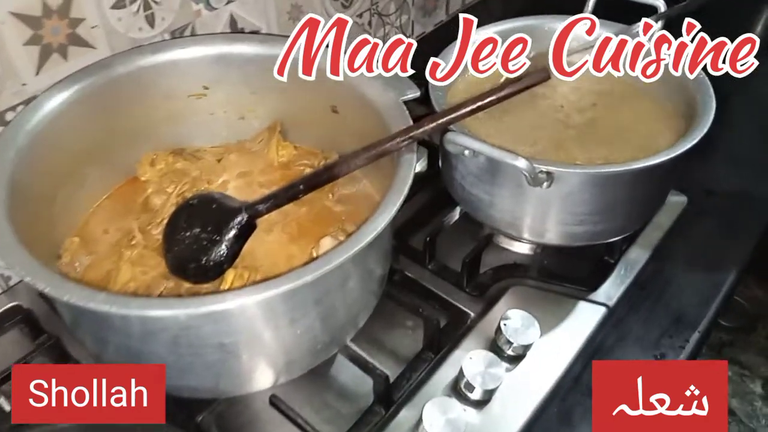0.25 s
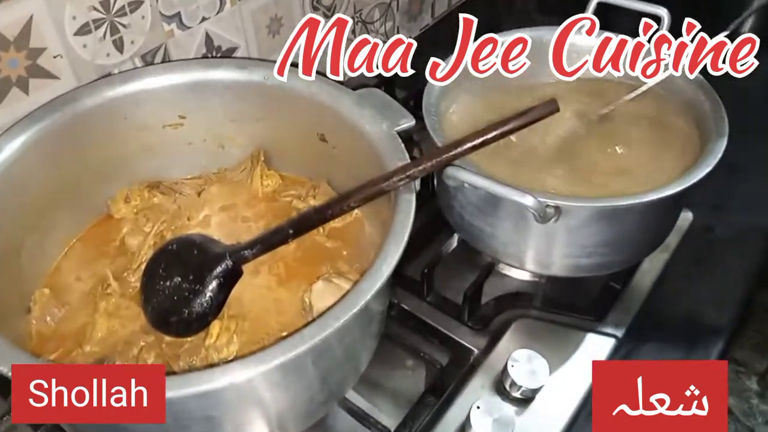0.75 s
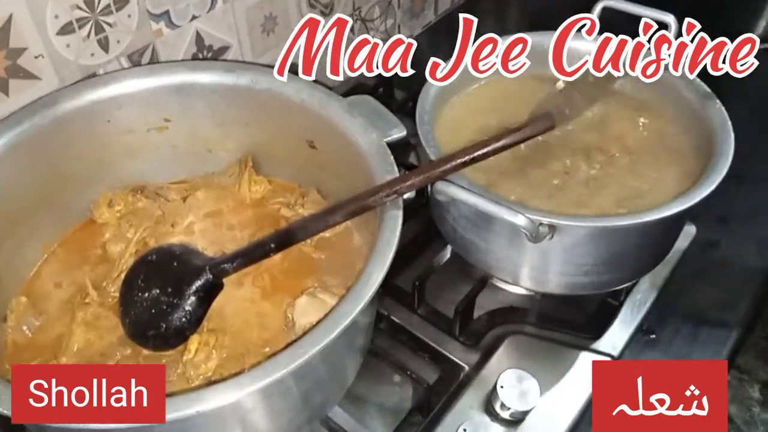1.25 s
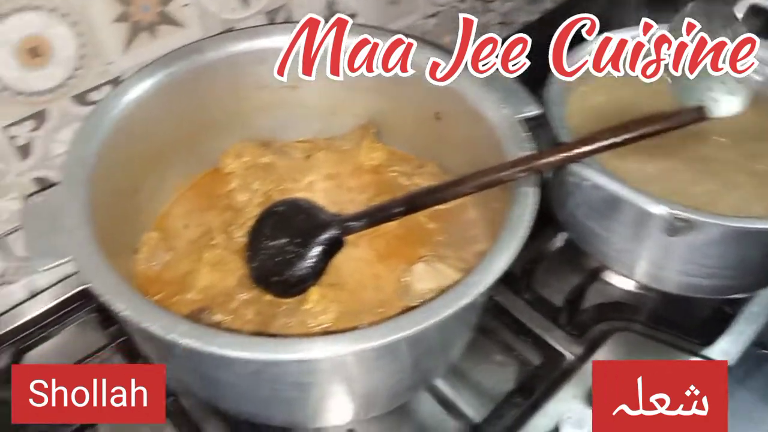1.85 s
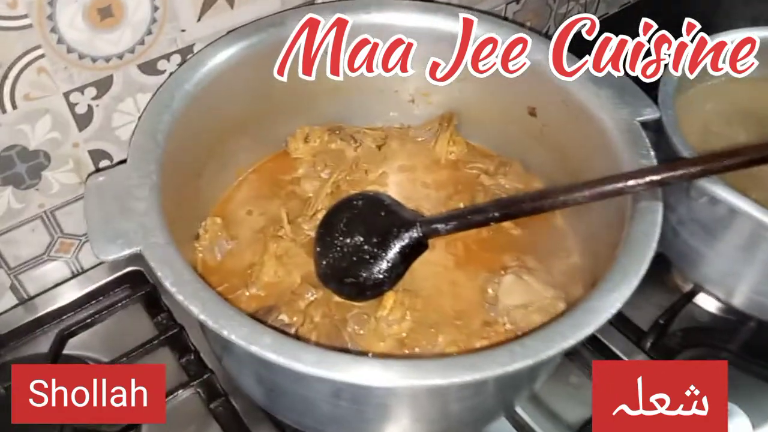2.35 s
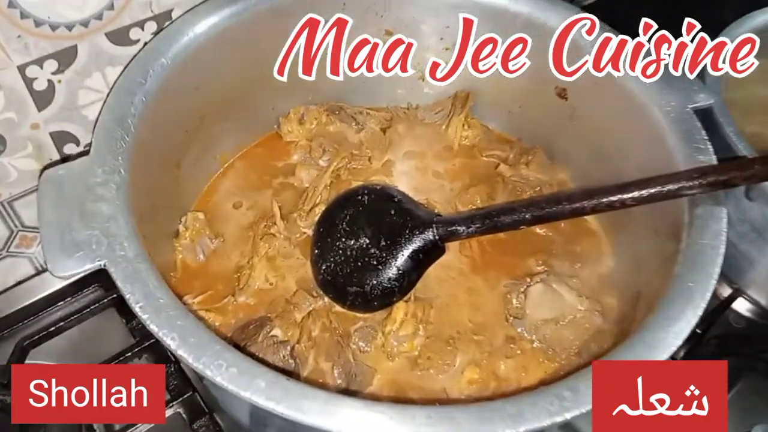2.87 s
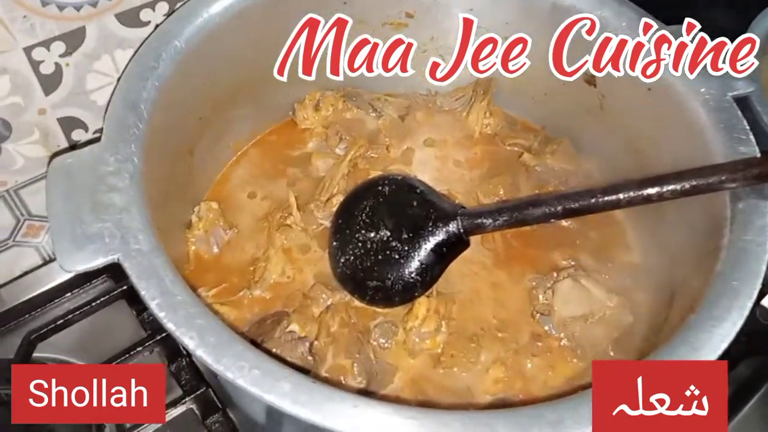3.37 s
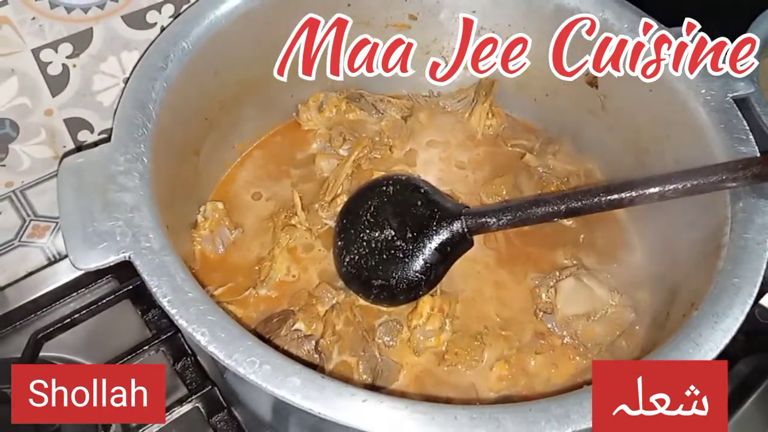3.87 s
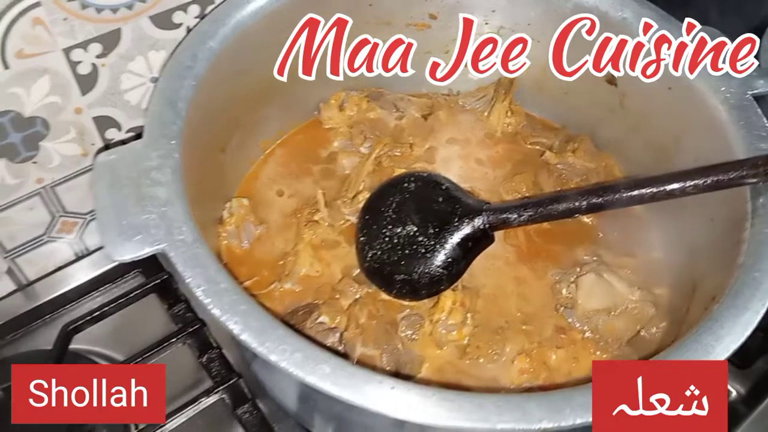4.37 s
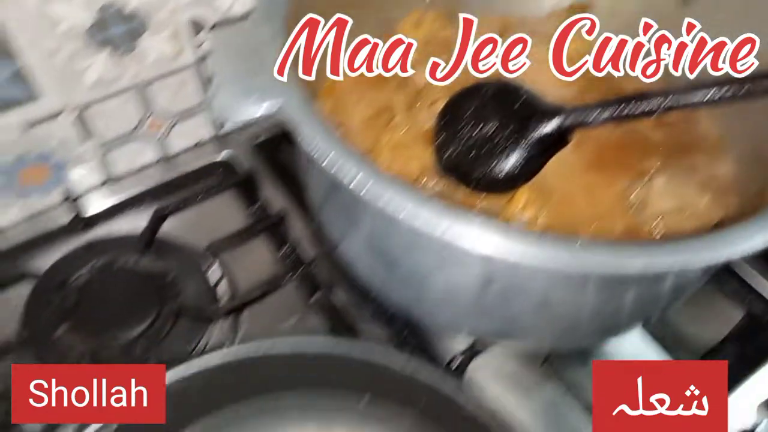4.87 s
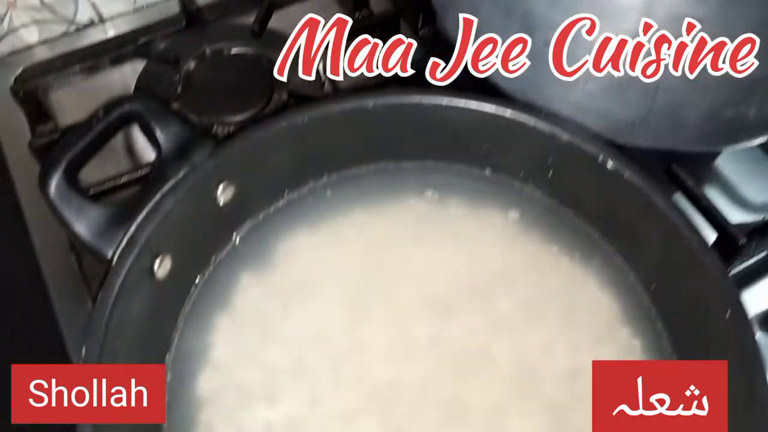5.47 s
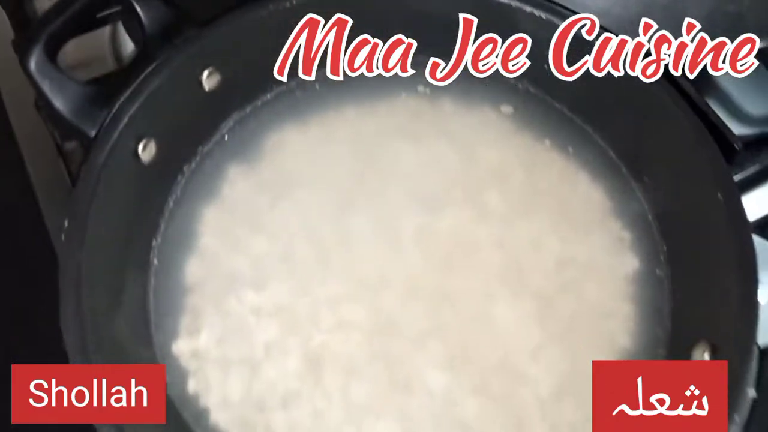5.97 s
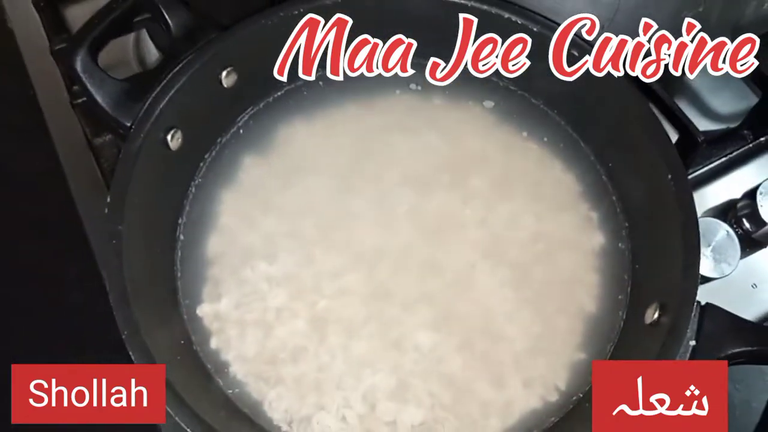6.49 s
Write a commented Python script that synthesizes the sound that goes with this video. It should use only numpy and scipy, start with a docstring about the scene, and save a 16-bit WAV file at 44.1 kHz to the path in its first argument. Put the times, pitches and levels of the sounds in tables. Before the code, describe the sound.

A ladle knocks ten times, hard and ringing, on a big aluminium pot in a kitchen, then a metal lid clatters and dull bumps follow.

```python
"""A ladle knocks on the wall of a large aluminium pot: cracks, beating shell modes, a noisy wash and a stove-top boom.
A lid clatters on its rim as uneven contact noise rings sheet-metal resonances; things are set down with
dull bumps of grainy noise. Pops are short damped tones, and a stew simmers in a small kitchen, amid filtered
background noise left blotchy by the noise suppressor of the phone that listens, which shortens the tails.
"""
import sys
import numpy as np
from scipy import signal
from scipy.fft import rfft, irfft, next_fast_len
from scipy.io import wavfile
from scipy.ndimage import uniform_filter1d, minimum_filter1d

SR = 44100
rng = np.random.default_rng(int(sys.argv[2]) if len(sys.argv) > 2 else 0)


def persist_wave(psi):
    """Save psi, clipped to +-1, as 16-bit WAV."""
    counts = np.round(np.clip(psi, -1, 1) * 32767).astype(np.int16)
    wavfile.write(sys.argv[1], SR, np.atleast_2d(counts).T)


N = 296828  # length in samples
T = np.arange(int(.6 * SR)) / SR  # time axis of one short sound, s
DEPTH_DB = 12  # deepest cut of the suppressor; the background is raised by as much
SPREAD_DB = 2.2  # random spread of mode strengths in the pot and the stove top


def amp(db):
    """Decibels to gain."""
    return 10 ** (np.asarray(db) / 20)


def unit(x):
    """Scaled to rms 1."""
    return x / np.sqrt(np.mean(x ** 2) + 1e-20)


def smooth(x, first, second, **axis):
    """Two running means in a row, for a rounder window than one."""
    return uniform_filter1d(uniform_filter1d(x, size=first, **axis), size=second, **axis)


def along(points, hz):
    """Reads a curve of (f/Hz, value) points on a log frequency axis."""
    f, value = np.transpose(points)
    return np.interp(np.log(hz + 1), np.log(f + 1), value)


def filtered(x, response):
    """x times a complex response of frequency, padded so that tails do not wrap round."""
    m = next_fast_len(N + SR // 2)
    return irfft(rfft(x, m) * response(np.fft.rfftfreq(m, 1 / SR)), m)[..., :N]


def coloured(x, spectrum):
    """x shaped by a (f/Hz, level/dB) curve and scaled to rms 1."""
    return unit(filtered(x, lambda hz: amp(along(spectrum, hz))))


def resonances(peaks):
    """A causal response made of (f/Hz, width/Hz, level/dB) peaks of alternating sign."""
    def response(f):
        total = 0
        for k, (centre, width, db) in enumerate(peaks):
            damping = 1j * f * width
            total = total + (-1) ** k * amp(db) * damping / (centre * centre - f * f + damping)
        return total
    return response


def onset(rise):
    """An exponential approach to full level; rise is its time constant in s."""
    return 1 - np.exp(-T / rise)


def add(track, s, sound):
    """Lays a sound on the track from second s."""
    part = track[round(s * SR):][:len(sound)]
    part += sound[:len(part)]


def ring(modes, slow, spread_db):
    """Modes struck at new strengths; each is a close pair that beats, as in a shell that is not quite round."""
    out = 0
    for hz, db, t60 in modes:
        neighbour_hz = hz + np.sqrt(hz) * rng.normal(.6, .2)
        pair = np.sin(2 * np.pi * hz * T) + 0.62 * np.sin(2 * np.pi * neighbour_hz * T)
        decay_db = -60 * T / (t60 * slow)
        out = out + amp(db + rng.normal(0, spread_db) + decay_db) * pair
    return out


def tilt(hz, bright_db):
    """A harder contact trades bass for treble: dB at each frequency."""
    return bright_db * np.tanh(np.log2((hz + 50) / 1200))


# Damping of noise bursts by pot and room: f/Hz, t60/s at decay factor 1
BURST_DECAY = [(80, 0.85), (210, 0.41), (560, 0.41), (1470, 0.45), (3880, 0.4), (8000, 0.23), (12000, 0.38),
               (15500, .22)]
STREAK_DB = 4.5  # rms unevenness of the crowded peaks


def burst(spectrum, bright_db, slow):
    """Noise of crowded narrow peaks that starts near rms 1, each frequency dying at its own speed."""
    white = rfft(rng.standard_normal(len(T)))
    peaks = unit(smooth(rng.standard_normal(len(white)), 30, 30))
    streaked = unit(irfft(white * amp(STREAK_DB * peaks), len(T)))
    hz, t, z = signal.stft(streaked, SR, nperseg=256)
    colour = amp(along(spectrum, hz) + tilt(hz, bright_db))[:, None]
    t60 = slow * along(BURST_DECAY, hz)[:, None]
    tail = signal.istft(z * colour * amp(-60 * t / t60), SR, nperseg=256)[1][:len(T)]
    return tail / np.sqrt(np.mean(colour ** 2))


# Spectral shapes of the background layers, each later scaled to rms 1: f/Hz, relative level/dB
HISS_SPECTRUM = [(530, -36), (1100, -7.5), (1350, -2.5), (1900, 2.5), (2550, -5), (2700, -15),
                 (3800, -51.5)]
SIZZLE_SPECTRUM = [(1400, -27), (2400, -18), (2900, -1), (3770, 4), (4470, 6), (5500, -5), (8000, -23),
                   (13500, -23), (15200, -14), (16100, -15), (16500, -43)]
ROAR_SPECTRUM = [(18, -45.5), (30, -5), (103, 2.5), (305, -5), (398, -6), (810, -1.5), (1110, -14.5),
                 (1300, -3.5), (1690, -28.5), (2860, -120)]
# Brief swells of the hiss: t/s, level/dB before the DEPTH_DB lift, half width/s (to 1/e)
HISS_SWELLS = [(0.839, -70, 0.058), (2.5, -56.5, 0.053), (2.722, -56.5, 0.093)]
# Layer levels in dB before the DEPTH_DB lift: steady part, and extra at the start that fades
HISS_DB, HISS_START_DB = -72, -61
SIZZLE_DB, SIZZLE_START_DB = -72.5, -77.5
ROAR_DB = -70.0
SETTLE_MIDDLE_S, SETTLE_SCALE_S = 0.5, 0.29  # midpoint and time scale of the S-shaped fade
SPITS_PER_S = 25


def simmer():
    """Burner roar, a background hiss that drops as the noise suppressor settles, and a sizzle with sparse spits."""
    t = np.arange(N) / SR
    settling = 1 / (1 + np.exp((t - SETTLE_MIDDLE_S) / SETTLE_SCALE_S))
    swells = sum(amp(db) * np.exp(-((t - s) / width) ** 2) for s, db, width in HISS_SWELLS)

    # the three layers share one field of suppressor blotches
    z = signal.stft(rng.standard_normal((3, N)), nperseg=512)[2]
    blotches = uniform_filter1d(rng.standard_normal(z.shape[1:]), size=5, axis=0)
    blotches = uniform_filter1d(blotches, size=8, axis=1)
    noise = signal.istft(z * amp(0.71 * unit(blotches)), nperseg=512)[1][:, :N]
    spits = (rng.random(N) < SPITS_PER_S / SR) * rng.standard_normal(N) * 9
    noise[1] += spits

    hiss = coloured(noise[0], HISS_SPECTRUM)
    sizzle = coloured(noise[1], SIZZLE_SPECTRUM)
    roar = coloured(noise[2], ROAR_SPECTRUM)
    mix = (amp(HISS_DB) + amp(HISS_START_DB) * settling + swells) * hiss
    mix += (amp(SIZZLE_DB) + amp(SIZZLE_START_DB) * settling) * sizzle
    mix += amp(ROAR_DB) * roar
    return amp(DEPTH_DB) * mix


# Clear pops and ticks: t/s, relative level/dB, f/Hz
CLEAR_TICKS = [(0.1401, -45, 3730), (0.196, -50.5, 660), (0.3342, -46, 3900), (0.4705, -46.5, 3900),
               (0.703, -46.5, 4060), (0.9967, -45, 3650), (1.94, -35, 3770), (2.384, -48, 1680),
               (2.5614, -34.5, 3920), (3, -45, 4180), (3.2894, -48.5, 3470), (3.5473, -39, 3600),
               (3.725, -49.5, 843), (4.007, -47.5, 1910), (4.101, -48, 1730), (4.243, -51, 888),
               (4.479, -50.5, 1412), (5.189, -46.5, 1650), (5.25, -48, 1725), (5.799, -52.5, 862),
               (5.928, -50, 1300), (6.03, -51.5, 1250), (6.106, -51.5, 1306), (6.184, -47.5, 1215),
               (6.499, -50.5, 1860)]
TICK_CYCLES = 38  # cycles of the main resonance until it is 60 dB down
FAINT_COUNT, FAINT_FLOOR_DB, FAINT_RANGE_DB = 40, -60, 8  # scattered pops, levels relative
FAINT_LOW_HZ, FAINT_HIGH_HZ = 696, 4600


def ticks():
    """Short pops, some clear and many faint: one damped resonance with weak neighbours."""
    out = np.zeros(N)
    faint = []
    for place, strength, pitch in rng.random((FAINT_COUNT, 3)):
        hz = FAINT_LOW_HZ * (FAINT_HIGH_HZ / FAINT_LOW_HZ) ** pitch
        faint.append((place * N / SR, FAINT_FLOOR_DB + FAINT_RANGE_DB * strength, hz))
    for s, db, hz in CLEAR_TICKS + faint:
        modes = [(hz, 7.5, 1), (1.08 * hz, 2.5, .6), (.88 * hz, 2.5, .6)]
        pop = ring(modes, TICK_CYCLES / hz, 0.5)
        add(out, max(s - .001, 0), amp(db) * pop * onset(3 / hz))
    return out


# Lid on rim: t/s, strike level/dB, rattle level/dB, rise/s, hold/s, fall/(dB/s),
# then low, middle and upper ring level/dB relative to the rattle
LID_STRIKES = [(4.556, -4, -19.5, 0.002, 0.016, 151, -19, -0.5, -12.5),
               (4.625, -6, -25, .004, 0.019, 191, -6.5, -4, -11.5),
               (4.716, -2.5, -20, 0.0083, .03, 203, -1.5, -9.5, -9),
               (4.777, -4, -25.5, 0.0064, .02, 225, -1, -4, -7),
               (4.896, -9, -19.5, 0.0039, 0.061, 227, -9, -9.5, -8.5),
               (5.019, -40, -40, 0.013, 0.015, 136.5, 8.5, 0, -0.5)]
# Low, middle and upper groups of rings: f/Hz, width/Hz, relative level/dB
LID_RINGS = [
    [(287, 28, 4.5), (353.5, 12.2, 6.5), (486, 120, -8)],
    [(983, 7.2, -6), (1046.5, 28, -3)],
    [(1355, 24, -3.5), (1287, 10, -8)],
]
# Sheet-metal modes of the lid: f/Hz, width/Hz, relative level/dB
LID_MODES = [(1646, 31, 1), (1817, 13, -1.5), (1985, 14, -1.5), (2237, 36, -7), (2517, 14, -3.5),
             (2610, 12, -3), (2900, 20, -5), (3275, 25, 1.5), (3245, 14, -12), (3546, 84, 2),
             (3780, 15, -3), (4040, 20, 2.5), (4340, 30, 1.5), (4880, 7.8, 2.5), (4970, 5.2, -1.5),
             (5480, 26, -6.5), (6250, 25, -7), (6830, 29, -15)]
# Spectral shape of metal contact: f/Hz, relative level/dB
CLASH_SPECTRUM = [(90, -49.5), (150, -22), (280, -4), (1000, -11.5), (1600, -8.5), (3560, -12),
                  (5800, -14.5), (7800, -33.5), (10000, -46), (13500, -49.5), (15300, -30.5),
                  (15900, -45.5), (16300, -74)]
LID_SPREAD_DB = 3.5  # random spread of the mode strengths at each strike
STRIKE_T60_S = 0.11  # fade laid over the burst's own decay


def rolled_off(peaks):
    """Resonances with their treble skirts rolled off, as by the microphone."""
    return lambda hz: resonances(peaks)(hz) / (1 + 1j * hz / 6000) ** 4


def lid():
    """Strikes and dense uneven contacts drive thin sheet metal, which rings on as the contact hiss dies."""
    s, strike_db, rattle_db, rise, hold, fall, *rings_db = np.transpose(LID_STRIKES)[..., None]
    t = np.maximum(np.arange(N) / SR - s, 0)
    rattles = (1 - np.exp(-t / rise)) * amp(rattle_db - fall * np.maximum(t - hold, 0))

    def force(db):
        """All rattles together, summed as powers."""
        return np.linalg.norm(rattles * amp(db), axis=0)

    unevenness_db = uniform_filter1d(rng.standard_normal((5, N)), size=90) * 32
    contacts = unit(rng.standard_normal((5, N)) * amp(unevenness_db))
    out = force(0) ** 1.03 * amp(-3.0) * coloured(contacts[0], CLASH_SPECTRUM)

    for drive, peaks, db in zip(contacts[2:], LID_RINGS, rings_db):
        steady_ring = filtered(drive, rolled_off(peaks))
        out += filtered(force(db) * drive, rolled_off(peaks)) / np.std(steady_ring)

    sheet_gain = amp(-4) / np.std(filtered(contacts[1], rolled_off(LID_MODES)))
    for start, db, rattle in zip(s[:, 0], strike_db[:, 0], rattles):
        struck = [(hz, width, level + rng.normal(0, LID_SPREAD_DB)) for hz, width, level in LID_MODES]
        out += sheet_gain * filtered(rattle * contacts[1], rolled_off(struck))
        strike = amp(db - 12 - 60 * T / STRIKE_T60_S) * burst(CLASH_SPECTRUM, 0, 1)
        add(out, start - .0015, strike * onset(0.0018))
    return out


# Dull bumps and scrapes: t/s, level/dB, rise/s, decay factor, brightness/dB,
# boom level/dB, knock f/Hz, knock level/dB (boom and knock are relative to the bump)
DULL_CONTACTS = [(0.141, -51.5, 0.029, 1, 2, -8.5, 657, 16), (0.419, -44, 0.005, 0.58, 0.5, -23, 1870, 8.5),
                 (.577, -49.5, 0.0018, 0.43, 5.5, -30, 1780, 10),
                 (.835, -43.5, 0.0058, 0.64, 4, -20, 1680, -1),
                 (1.824, -35, 0.019, 0.78, -2.5, -1.5, 546, -16),
                 (1.846, -25, 0.029, 0.59, 5.5, -11, 590, -1.5),
                 (3.305, -32, 0.012, 0.73, -2, -12, 733, -3), (3.325, -37, 0.0077, 0.59, 7, -3.5, 2035, 6),
                 (4.347, -33.5, 0.0086, 0.65, 3.5, -2.5, 678, 10.5),
                 (4.39, -43.5, 0.013, 0.63, 7.5, -15.5, 2060, 3.5),
                 (5.296, -30.5, 0.0055, 0.7, 0.5, 0, 343, 4),
                 (5.3065, -31, 0.001, 0.094, -4, 7.5, 594, 18.5),
                 (6.356, -27.5, 0.011, 0.54, -6.5, -7, 618, -5),
                 (6.387, -36, 0.0011, 0.68, 4, 4.5, 680, 3.5), (6.69, -39, 0.014, 0.67, 8, -13, 490, 0.5)]
# Spectral shape of a dull contact: f/Hz, relative level/dB
DULL_SPECTRUM = [(90, -28), (150, -5.5), (400, -8), (650, 1), (1100, -12.5), (1500, -22), (2000, -10.5),
                 (2950, -18), (3300, -24), (5500, -28), (7500, -50.5), (13000, -79), (15300, -61.5),
                 (16500, -59)]
# Stove-top modes, also shaken by the ladle: f/Hz, relative level/dB, t60/s at decay factor 1
STOVE_MODES = [(109.37, -0.5, 0.52), (97.85, 1.5, 0.31), (124.95, -6, 0.37), (151, -5, 0.34),
               (181.5, -9, 0.41), (81.36, -5.5, 0.38)]


def bumps():
    """Soft contacts build up in grains, without a crack, and knock one short resonance with an overtone."""
    out = np.zeros(N)
    for s, db, rise, slow, bright_db, boom_db, hz, knock_db in DULL_CONTACTS:
        grains = amp(3.4 * unit(smooth(rng.standard_normal(len(T)), 90, 60)))
        body = burst(DULL_SPECTRUM, bright_db, slow) * grains * onset(rise) ** 2
        knock_modes = [(hz, 0, .14), (1.17 * hz, -5, .1)]
        knock = amp(knock_db) * ring(knock_modes, slow, 1.7) * onset(rise)
        boom = amp(boom_db) * ring(STOVE_MODES, 1.37 * slow, SPREAD_DB) * onset(0.0055)
        add(out, s, amp(db) * (body + knock + boom))
    return out


# Ladle blows; a blow low on the wall has weight, one near the rim rings the top modes:
# t/s, level/dB, weight/dB, ring/dB, rim ring/dB, decay factor
LADLE_BLOWS = [(1.399, -13, -6, -1.5, 1, 1), (1.605, -8, -10, 0, -3, 0.99),
               (1.899, -18.5, -19, -6, -12, 1.38), (2.177, -12, -3, 2, -24, 1.07),
               (2.412, -8, 0.5, -0.5, -26, 0.93), (2.629, -7.5, -9, -4, -29.5, 1.21),
               (2.821, -12.5, 2.5, 0.5, -21.5, 0.83), (3.025, -10.5, 1, 1.5, -15, 0.85),
               (3.421, -7, 0, 1, -9.5, 1.016), (3.762, -4.5, -0.5, 2.5, -20, .92)]
# Modes of the pot wall: f/Hz, relative level/dB, t60/s at decay factor 1
POT_MODES = [(299, -19.5, 0.85), (345, -19, 0.73), (552, -14.5, 0.35), (830, -20, 0.22), (1028, -17, 0.24),
             (1066, -2.5, 0.04), (1319, -16, 0.083), (1391, -2, 0.21), (1768, -5.5, 0.22),
             (2080, -18.5, 0.18), (2380, -22, 0.37), (2645, -16.5, 0.23), (2740, -15.5, 0.19),
             (2880, -21, .3), (3450, -15, 0.15), (3510, -21, .35), (4460, -18.5, 0.16), (4260, -23.5, 0.16),
             (4000, -23.5, 0.1), (4380, -26.5, 0.097), (5000, -22.5, .22), (5060, -24.5, 0.18),
             (5590, -21, 0.24), (5970, -22, .2), (6700, -23, .2)]
# Dense modes of the pot, heard as noise: f/Hz, relative level/dB
WASH_SPECTRUM = [(90, -36), (200, 2.5), (560, 0.5), (1100, -7), (1800, -3), (2900, -16), (4250, -3.5),
                 (5800, -14.5), (7400, -23.5), (8600, -38), (13500, -43.5), (15300, -23.5), (16000, -39),
                 (16400, -56.5)]
# Ring of the wall at full weight (0 dB): f/Hz, level/dB added to the modes
FULL_WEIGHT_RING = [(560, -16.5), (1390, -13.5), (1780, -11), (2600, -13.5), (3500, -12.5), (4400, -11.5),
                    (5300, -15), (6700, -21.5)]
# How the ring follows weight: f/Hz, dB of ring gained per dB of weight
RING_PER_WEIGHT = [(560, 0.17), (1390, 0.86), (1780, 0), (3000, 0.4), (4400, -0.8)]
RIM_HZ = 6000  # where the rim ring level applies
WASH_DB, BOOM_DB = -17.5, -14.5  # at full weight, relative to the blow
WASH_PER_WEIGHT = .43  # dB of wash per dB of weight


def ladle():
    """Each blow cracks, rings the pot wall, leaves a wash of dense modes and shakes the stove top."""
    out = np.zeros(N)
    for s, db, weight_db, ring_db, rim_db, slow in LADLE_BLOWS:
        crack = amp(-3.5 - 60 * T / 0.05) * burst(WASH_SPECTRUM, 12.0, 0.47)

        # where the blow lands sets the balance of the modes
        spot = [(RIM_HZ, rim_db)]
        for hz, level in FULL_WEIGHT_RING:
            spot.append((hz, level + ring_db + along(RING_PER_WEIGHT, hz) * weight_db))
        spot.sort()
        modes = [(hz, level + along(spot, hz), t60) for hz, level, t60 in POT_MODES]
        wall = ring(modes, slow, SPREAD_DB)

        wash = amp(WASH_DB + WASH_PER_WEIGHT * weight_db) * burst(WASH_SPECTRUM, 0, slow) * onset(0.0036)
        boom = amp(BOOM_DB + weight_db) * ring(STOVE_MODES, slow, SPREAD_DB) * onset(0.05)
        add(out, s - .0012, amp(db) * onset(0.002) * (crack + wall + wash + boom))
    return out


def scene():
    """Everything heard in the kitchen, as one channel."""
    return (simmer() + ticks() + lid() + bumps() + ladle())[None]


def suppress(x):
    """Turns down every frequency whose recent power is near the quietest power of the surrounding second."""
    z = signal.stft(x, nperseg=512, noverlap=384)[2]
    power = uniform_filter1d(np.abs(z) ** 2, size=7, axis=1)
    power = np.abs(uniform_filter1d(power, size=9, axis=2))
    background = minimum_filter1d(uniform_filter1d(power, size=30, axis=2), size=400, axis=2)
    threshold = background * amp(18.0)  # a power ratio of about 8
    keep = 1 / (1 + (threshold / (power + 1e-20)) ** 1.5)
    floor = amp(-DEPTH_DB)
    gain = floor + (1 - floor) * keep
    return signal.istft(z * gain, nperseg=512, noverlap=384)[1][:, :N]


BASS_CUT_HZ, TOP_HZ = 55, 16900  # corner of the bass loss, upper band limit


def record(dry):
    """Noise is suppressed first; then deep bass is lost and nothing passes the band limit."""
    def band(hz):
        return (1j * hz / (BASS_CUT_HZ + 1j * hz)) ** 2 * (hz < TOP_HZ)
    return filtered(suppress(dry), band)


dry = scene()
out = record(dry)
persist_wave(out)
```